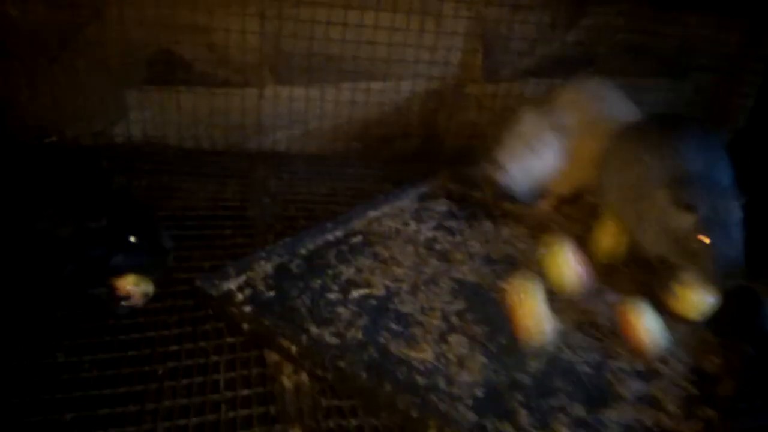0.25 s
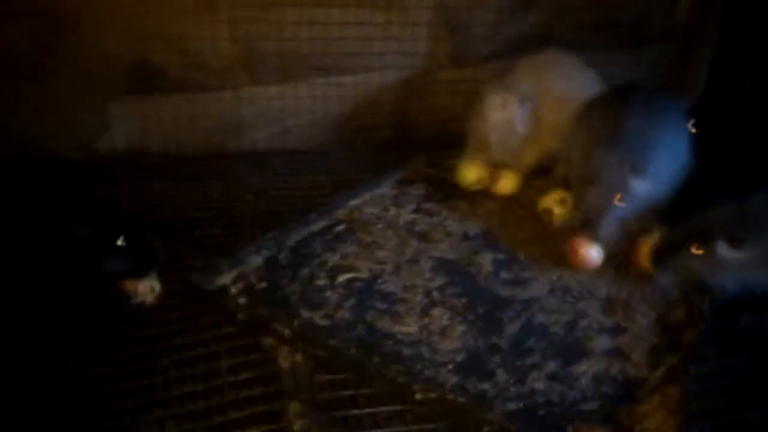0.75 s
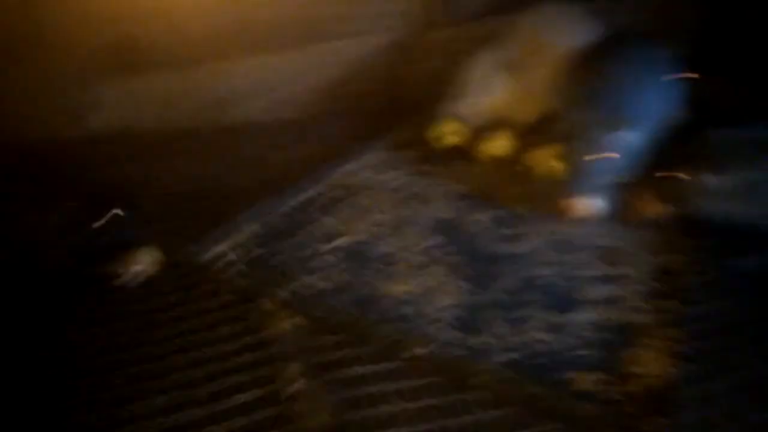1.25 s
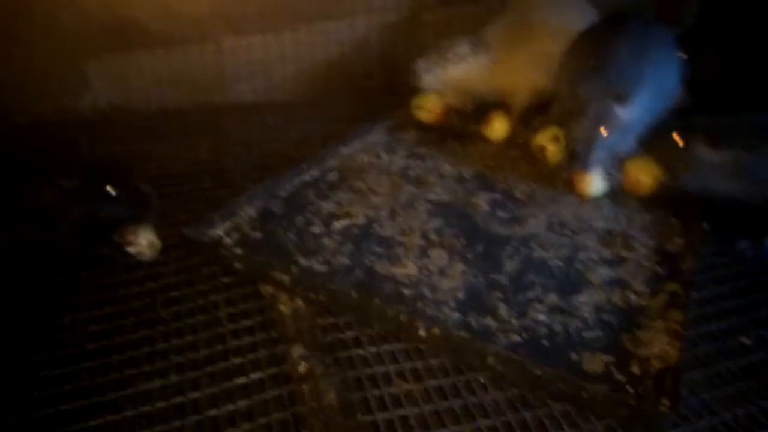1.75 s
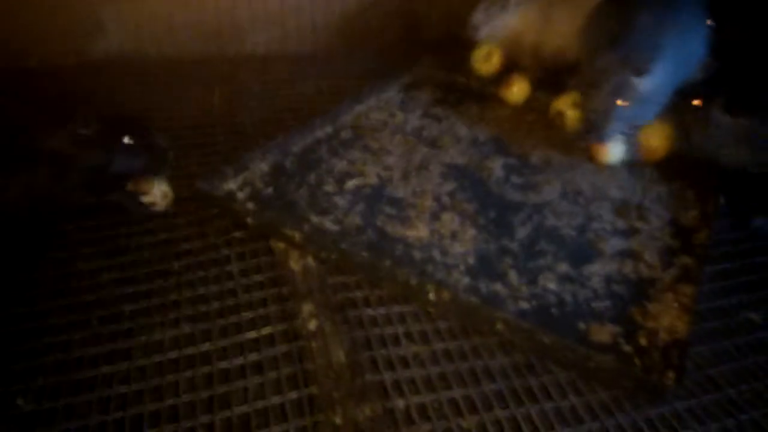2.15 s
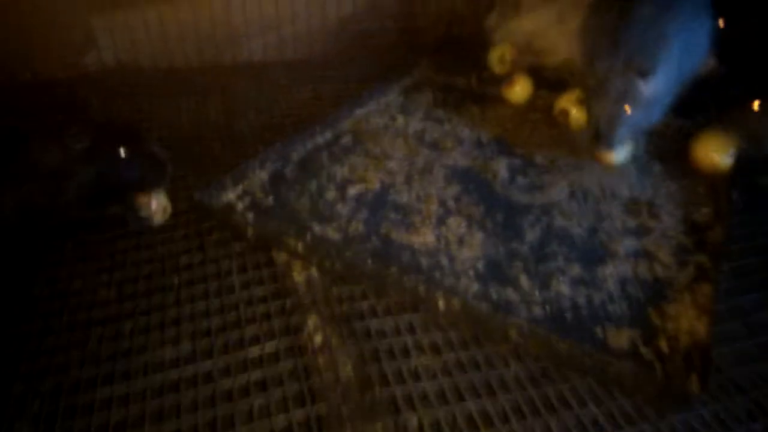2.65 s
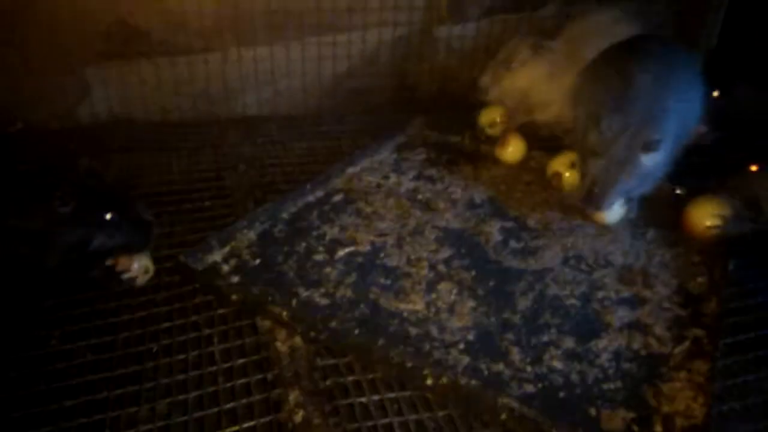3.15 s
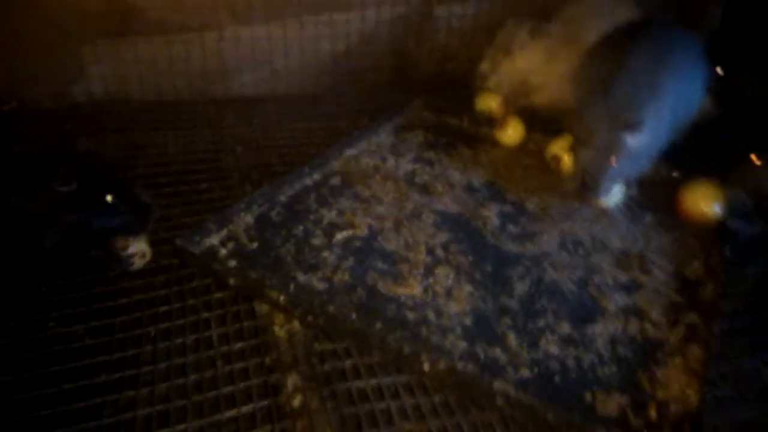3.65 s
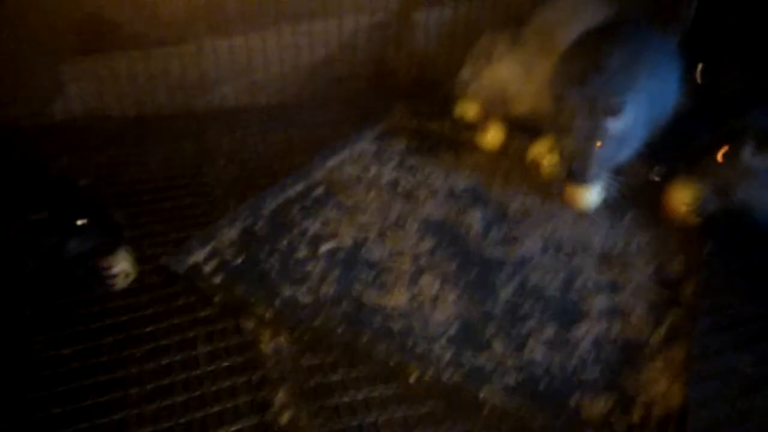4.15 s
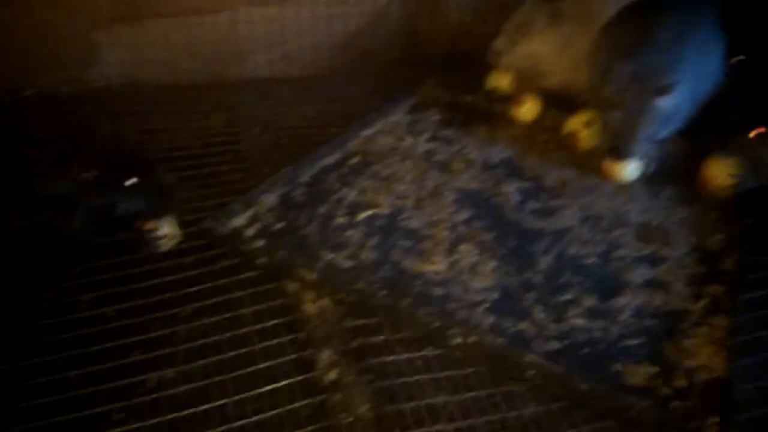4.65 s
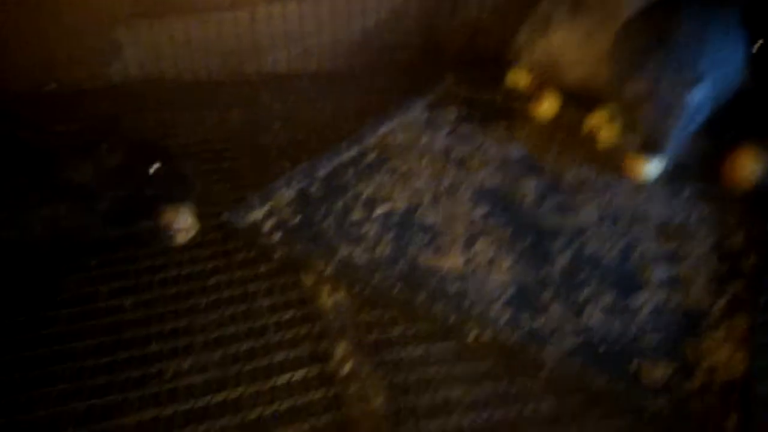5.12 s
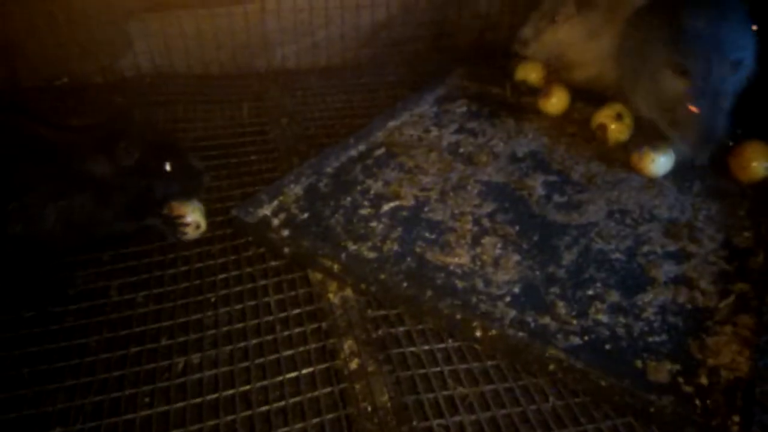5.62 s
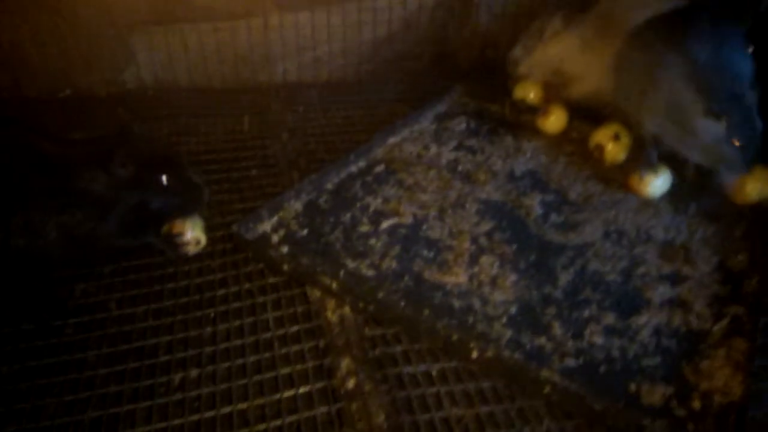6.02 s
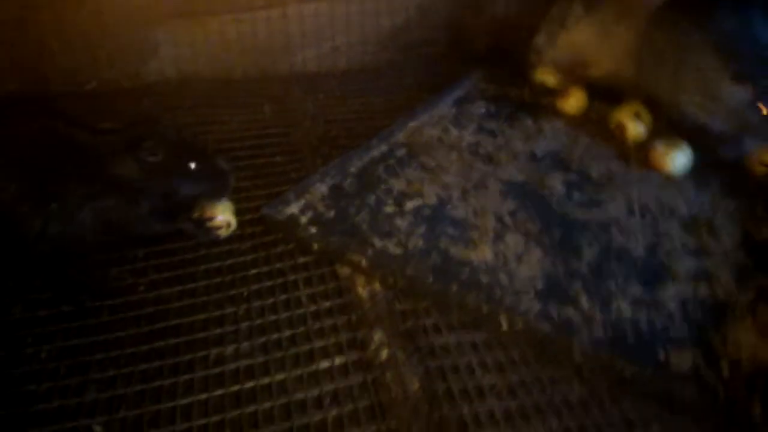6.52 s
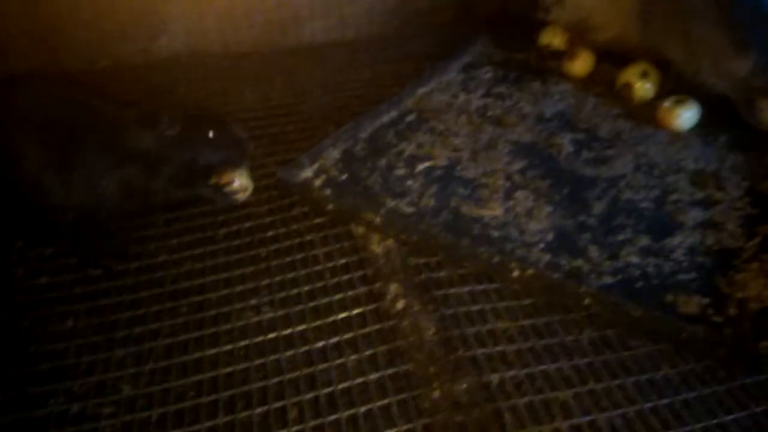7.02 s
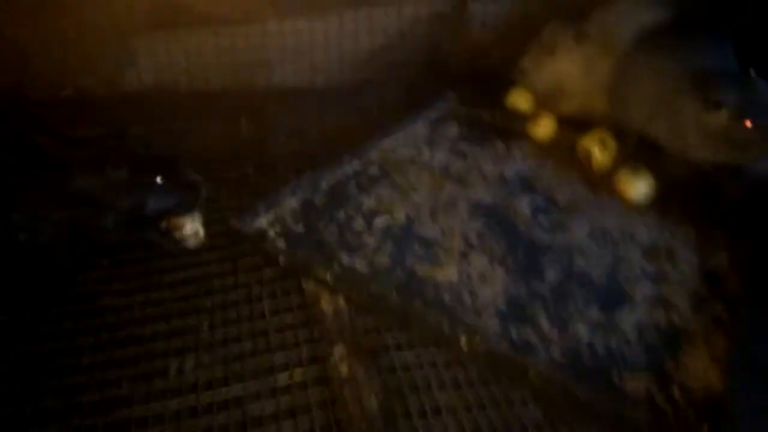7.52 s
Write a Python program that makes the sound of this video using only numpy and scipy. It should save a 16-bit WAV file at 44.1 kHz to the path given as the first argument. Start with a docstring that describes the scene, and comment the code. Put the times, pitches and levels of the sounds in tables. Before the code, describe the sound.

A close, loud tumble of hollow thuds opens as apples drop on a feed tray in a wire cage, with a few lighter knocks after. Then chicks peep almost without pause, sharp falling chirps mixed with short cheeps, while hens give brief low clucks. Claws tick on mesh, straw rustles faintly and a low motor hums. Small shed with short reflections, handheld stereo microphone, duller on the right.

```python
"""Chicks and hens in a shed

Chicks peep (gliding near-sines) and hens cluck (throat-filtered harmonics) among wire cages. Apples thud on
a feed tray (ringing modes and a noise thump), claws tick on the mesh and the cage rattles (shaped noise).
A motor hums (three harmonics) under straw rustle (flickering noise bands).
Two microphone ports hear it with shed reflections; the right one is shadowed in the treble.
"""
import sys
import numpy as np
from scipy import signal
from scipy.fft import rfft, irfft, next_fast_len
from scipy.io import wavfile
from scipy.ndimage import uniform_filter1d

SR = 44100
rng = np.random.default_rng(int(sys.argv[2]) if len(sys.argv) > 2 else 0)


def bounce(signal):
    """Save signal as a 16-bit WAV file at the path given by the first command-line argument."""
    frames = np.transpose(np.atleast_2d(signal))
    limited = np.clip(frames, -1, 1)
    pcm = np.round(limited * 32767).astype(np.int16)
    wavfile.write(sys.argv[1], SR, pcm)


N = 343098
PADDED = next_fast_len(N + SR // 2, True)
HZ = np.fft.rfftfreq(PADDED, 1 / SR)


def undb(db):
    """dB to gain."""
    return 10 ** (np.asarray(db) / 20)


def shape(hz, table):
    """Gain at hz, interpolated in dB over log frequency."""
    f, db = np.transpose(table)
    return undb(np.interp(np.log(np.maximum(hz, 1)), np.log(f), db))


def unit(x):
    """Scale to rms 1."""
    return x / np.sqrt(np.mean(x ** 2))


def noise(table):
    """Noise of rms 1, coloured by (Hz, relative dB) points."""
    white = rfft(rng.standard_normal(PADDED))
    return unit(irfft(white * shape(HZ, table), PADDED)[:N])


def walk(rate_hz, size=N):
    """Smooth random wander with spread near 1: held random steps, averaged twice."""
    k = max(int(SR / rate_hz), 1)
    steps = np.repeat(rng.standard_normal(size // k + 1), k)
    return 1.255 * uniform_filter1d(uniform_filter1d(steps, k), k)[:size]


def add(out, start_s, x):
    """Mix x into out from start_s on."""
    i = int(start_s * SR)
    out[i:i + len(x)] += x[:N - i]


def fades(size, attack_s, release_s):
    """Rounded start and end."""
    t = np.arange(size) / SR
    ramp = np.minimum(t / attack_s, t[::-1] / release_s)
    return np.sin(np.pi / 2 * np.clip(ramp, 0, 1)) ** 2


# Background levels. Each row: time in seconds, hum in dB, straw rustle in dB.
SHED_LEVELS = [(0, -40, -46), (.45, -40, -50), (.7, -49, -56.5), (1.0, -45.5, -53), (1.7, -41, -49.5),
               (2.2, -39.5, -53.5), (3.1, -35.5, -45), (3.42, -37, -55), (3.75, -39, -47.5),
               (4.2, -37, -53), (5.0, -37.5, -51.5), (5.5, -38.5, -54), (6.3, -43.5, -53), (7.05, -44, -47),
               (7.4, -39.5, -51.5), (7.78, -39, -50.5)]
# Motor hum harmonics. Each row: multiple of the motor speed, level relative to the hum in dB.
HUM_HARMONICS = [(1, -7), (2, -16.5), (3, -30.5)]
# Straw rustle spectrum. Each row: frequency in Hz, relative density in dB per Hz.
RUSTLE_SPECTRUM = [(24, -46), (40, -6), (77, -4), (121, -7), (151, -15.5), (262, -16), (2050, -26),
                   (4240, -30), (7930, -35), (16000, -42.5)]
MOTOR_START_HZ, SPEEDS_UP_HZ_PER_S = 51.1, .45


def shed():
    """A motor hum of wavering speed, over rustle whose octave bands flicker partly on their own."""
    s, hum_db, rustle_db = np.transpose(SHED_LEVELS)
    t = np.arange(N) / SR
    motor_hz = (MOTOR_START_HZ + SPEEDS_UP_HZ_PER_S * t) * (1 + 0.0051 * walk(3.33))
    turn = 2 * np.pi * np.cumsum(motor_hz) / SR
    hum = np.zeros(N)
    for k, db in HUM_HARMONICS:
        hum += np.sqrt(2) * undb(db + 1.2 * k * walk(6)) * np.sin(k * turn)

    spectrum = rfft(noise(RUSTLE_SPECTRUM), PADDED)
    shuffle = walk(6)  # shared by all bands
    rustle = np.zeros(N)
    for centre_hz in 40 * 2. ** np.arange(9):
        octaves = np.log2(np.maximum(HZ, 1) / centre_hz)
        band = np.cos(np.pi / 2 * np.clip(octaves, -1, 1)) ** 2
        flicker_db = 1.2 * shuffle + 2.2 * walk(7) + 1.2 * walk(25)
        rustle += irfft(spectrum * band, PADDED)[:N] * undb(flicker_db)
    return hum * undb(np.interp(t, s, hum_db)) + rustle * undb(np.interp(t, s, rustle_db))


# What the beak passes of the overtones. Each row: frequency in Hz, gain in dB.
BEAK = [(1700, -5), (3200, -28), (4600, -13), (5600, -26), (8000, -34), (13000, -31)]
HOARSE, FLUTTER_HZ = .24, 380  # throat flutter that splits a short call into strands: depth scale, mean rate
ECHO_S, ECHO_DB = .04, -12.5


def whistle(hz, db, attack_s):
    """A quivering near-sine with overtones weighted by frequency through the beak; a wall throws it back once."""
    size = len(hz)
    short = np.sqrt(.3 * SR / size)  # short calls are less steady and hoarser
    quiver = .006 * short * walk(130, size=size) + .008 * walk(25, size=size)
    phase = 2 * np.pi * np.cumsum(hz * (1 + quiver)) / SR
    tone = np.sin(phase)
    for k in (2, 3):
        tone += shape(k * hz, BEAK) * np.sin(k * phase) / (k - 1)

    flutter = np.sin(2 * np.pi * np.cumsum(FLUTTER_HZ * (1 + .3 * walk(60, size=size))) / SR)
    hoarse = 1 + HOARSE * (short - 1) * (flutter + .7 * walk(900, size=size))
    level = np.sqrt(2) * undb(db + 2.15 * short ** .5 * walk(60.5, size=size))
    call = tone * hoarse * level * fades(size, attack_s, 0.012)
    late = np.zeros(int(ECHO_S * SR))
    return np.append(call, late) + undb(ECHO_DB) * np.append(late, call)


# Full peeps scoop up, sag, then drop. Each row: start in seconds, length in seconds, top in Hz, end in Hz,
# scoop as a share of the top, level at mid-length in dB, swell from start to end in dB.
PEEP_CALLS = [(0.0, 0.12, 3900, 2910, 0.014, -49.5, -4), (0.845, 0.23, 4116, 2990, 0.072, -45, 5),
              (1.668, 0.18, 4070, 3000, 0.011, -46.5, 6), (2.015, 0.075, 4520, 2890, 0.34, -46.5, 8),
              (2.608, 0.23, 4060, 2930, 0.1, -44, 5), (3.514, 0.28, 4060, 2650, 0.08, -45.5, 9),
              (3.92, 0.07, 4560, 2930, 0.24, -41, 3), (4.627, 0.3, 4197, 2990, 0.11, -38, 9),
              (5.07, 0.16, 4616, 2810, 0.3, -40.5, 11), (5.774, 0.07, 3810, 2605, 0.054, -43, 14),
              (6.037, 0.3, 4240, 3010, 0.13, -40.5, 8.5), (6.465, 0.148, 4385, 2990, 0.018, -39.5, -2.5),
              (6.899, 0.042, 2770, 2220, 0.19, -46, 14), (6.974, 0.047, 3915, 3030, 0.21, -43.5, 7),
              (7.33, 0.27, 4196, 3130, .07, -49.5, 5), (7.705, 0.088, 4290, 4160, 0.055, -48.5, 14)]
# Plain notes glide one way. Each row: start in seconds, length in seconds, start pitch in Hz, end pitch in Hz,
# level at mid-length in dB, swell from start to end in dB.
PLAIN_NOTES = [(0.239, 0.045, 4240, 3100, -51, -2), (0.308, 0.065, 4010, 3230, -52.5, -10),
               (0.739, 0.031, 2790, 2400, -52.5, 0), (1.416, 0.045, 2430, 2590, -50, 2),
               (1.409, 0.055, 3830, 3080, -46.5, 14), (1.464, 0.035, 2666, 2316, -40.5, 2),
               (1.467, 0.027, 5300, 4780, -59, 2), (1.548, 0.032, 4700, 4050, -59, 0),
               (1.624, 0.043, 4860, 3570, -44, 5), (1.499, 0.21, 1413, 1534, -49, -5),
               (1.656, 0.046, 3215, 2970, -47.5, -4), (1.517, 0.066, 2600, 1940, -50, 10),
               (1.694, 0.027, 2600, 2334, -44.5, 4), (1.945, 0.047, 1814, 1800, -48, 11),
               (2.202, 0.074, 3065, 2560, -52.5, 2), (2.291, 0.055, 2620, 2175, -51.5, -23),
               (2.373, 0.047, 2410, 2320, -55, -13), (2.392, 0.05, 3300, 2930, -45.5, -13),
               (2.403, 0.089, 3630, 2920, -45, -4), (2.488, 0.062, 1926, 1556, -52, -8),
               (2.615, 0.037, 3300, 2870, -55, 2), (2.616, 0.048, 2350, 2395, -50, 4),
               (3.386, 0.048, 2500, 2390, -68, -4), (3.57, 0.019, 3380, 2770, -46.5, 6),
               (4.091, 0.065, 1537, 1590, -56, -11), (5, 0.085, 2830, 2326, -53.5, 0),
               (5.13, 0.049, 3120, 2700, -54, -8), (5.155, 0.046, 2410, 2390, -55.5, 5),
               (5.305, 0.09, 3300, 2660, -48, 7), (5.546, 0.062, 3395, 2944, -47, 12),
               (5.617, 0.044, 2700, 2160, -52.5, -14), (5.85, 0.028, 2570, 2470, -54, -5),
               (6.043, 0.067, 3070, 2180, -51, -6), (6.169, 0.044, 2650, 1850, -47, 0),
               (6.63, 0.049, 2370, 1940, -42, -6), (7.021, 0.049, 2820, 2410, -50.5, -8),
               (7.027, 0.028, 5260, 4820, -51, -2), (6.957, 0.015, 2050, 1860, -52, 0),
               (7.156, 0.042, 3500, 3000, -49.5, 0), (7.167, 0.048, 4120, 2944, -44.5, 12),
               (7.22, 0.041, 2490, 2310, -46, -6), (7.687, .09, 3210, 2750, -58, -5),
               (4.766, 0.08, 2080, 1765, -50.5, -1), (5.91, 0.059, 1996, 2003, -52, 13),
               (7.542, 0.084, 1880, 1960, -46.5, -1)]
# Two warbles, a short falling whimper and a low moan, drawn point by point, one list each.
# Each row: time in seconds, pitch in Hz, level in dB.
DRAWN_CALLS = [
    [(0.8, 2014, -51.5), (1.04, 2025, -54), (1.066, 2297, -46), (1.12, 2206, -41.5), (1.156, 2350, -52),
     (1.184, 2210, -39), (1.2, 2230, -48), (1.21, 2340, -51), (1.266, 2424, -45), (1.33, 1930, -40.5)],
    [(3.535, 1970, -53), (3.56, 2340, -51.5), (3.79, 2170, -47), (3.84, 2253, -47.5), (3.91, 2050, -42),
     (3.98, 1920, -48)],
    [(4.325, 1850, -55), (4.357, 1320, -45), (4.39, 1280, -53), (4.44, 1274, -70)],
    [(7.45, 940, -53.5), (7.58, 855, -65), (7.635, 820, -46), (7.7, 797, -51.5), (7.8, 797, -54)],
]
SAG, DROP_S = 0.11, 0.021  # share of the top lost per peep length; time constant of the final drop
SCOOP_S = .015  # time constant of the climb to the top
OVERSHOOT, SETTLE_S = 0.025, 0.03  # early upward bump as a share of the top, and when it peaks
NOTE_BEND, NOTE_FADE = 0.75, 0.14  # under 1 the glide is quickest at first; share of a note spent fading in


def chicks():
    """Full peeps, plain notes, warbles, a whimper and a moan, all from the same whistle; the plain note at 2.49
    s is instead a hen's high falling line."""
    out = np.zeros(N)
    for s, length_s, top_hz, end_hz, scoop, db, swell_db in PEEP_CALLS:
        t = np.arange(0, length_s + 0.013, 1 / SR)
        climb = scoop * np.exp(-t / SCOOP_S)
        bump = OVERSHOOT * (t / SETTLE_S * np.exp(1 - t / SETTLE_S)) ** 3
        held_hz = top_hz * (1 - SAG * t / length_s - climb + bump)
        drop = np.exp(np.minimum(t - length_s, 0) / DROP_S)
        hz = held_hz - (held_hz[-1] - end_hz) * drop
        add(out, s, whistle(hz, db + swell_db * (t / length_s - .5), 0.0075))

    for s, length_s, start_hz, end_hz, db, swell_db in PLAIN_NOTES:
        done = np.minimum(np.arange(0, length_s + 0.0065, 1 / SR) / length_s, 1)
        hz = start_hz + (end_hz - start_hz) * done ** NOTE_BEND
        add(out, s, whistle(hz, db + swell_db * (done - .5), NOTE_FADE * length_s))

    for points in DRAWN_CALLS:
        s, hz, db = np.transpose(points)
        t = np.arange(s[0], s[-1], 1 / SR)
        add(out, s[0], whistle(np.interp(t, s, hz), np.interp(t, s, db), 0.0029))
    return out


# Soft blows on the tray. Each row: start in seconds, peak in dB, centre in Hz.
TRAY_BLOWS = [(0.026, -8.5, 220), (0.036, -6, 450), (0.045, -5.5, 550), (0.054, -10, 460),
              (0.064, -10, 293), (0.166, -24.5, 272), (0.192, -16.5, 247), (0.225, -30, 314),
              (0.269, -16.5, 400), (.366, -20, 305), (1.333, -31.5, 336), (1.477, -35.5, 230),
              (1.61, -37.5, 327), (3.977, -24.5, 250), (4.107, -35.5, 268), (4.303, -33.5, 730),
              (4.69, -33.5, 271), (5.001, -31, 240), (6.119, -30, 450), (6.151, -40, 480),
              (6.371, -18, 760), (6.392, -20, 302), (6.437, -19.5, 327), (6.675, -21, 188),
              (7.122, -26, 480), (7.192, -35.5, 327), (7.443, -27, 390)]
# Tray modes. Each row: frequency in Hz, relative level in dB, t60 of a full blow in seconds.
TRAY_MODES = [(229, 5.5, 0.18), (323, 13.5, 0.25), (394, 9.5, 0.16), (481, 6.5, 0.13), (533, 3, 0.038),
              (790, 2, 0.053), (985, -1, 0.025), (1560, -16, 0.034)]


def thuds():
    """A push rings the modes near its centre, over a broad thump that scuffles on; light blows ring shorter."""
    out, t = np.zeros(N), np.arange(0, .15, 1 / SR)
    for s, db, centre_hz in TRAY_BLOWS:
        lasting = np.clip(1 + (db + 14) / 10, .3, 1)
        modes = np.zeros(len(t))
        for hz, mode_db, t60_s in TRAY_MODES:
            gain = undb(mode_db - 59 * np.log2(hz / centre_hz) ** 2)
            modes += gain * np.sin(2 * np.pi * hz * t) * 1000 ** (-t / t60_s / lasting)

        scuffle = .12 * undb(5 * walk(80, size=len(t))) * 1000 ** (-t / .2)
        push = (1000 ** (-t / 0.048) + scuffle) * np.minimum(t / 0.0017, 1)
        edges_hz = [centre_hz / 2.2, centre_hz * 2.2]
        sos = signal.butter(2, edges_hz, "bandpass", fs=SR, output="sos")
        thump = signal.sosfilt(sos, rng.standard_normal(len(t)) * push)
        blow = unit(modes) * np.minimum(t / .001, 1) + .45 * unit(thump)
        add(out, s, undb(db) * blow / np.abs(blow).max())
    return out


# Claws and beaks on the mesh. Each row: start in seconds, approximate peak of the crack in dB,
# treble drive in dB.
MESH_TICKS = [(0.026, -17, -29), (0.166, -35.5, -48), (0.215, -34, -52.5), (0.2693, -30, -56),
              (0.2974, -34, -54), (0.338, -35, -44.5), (0.4584, -26, -48), (1.339, -26, -57),
              (1.447, -32, -66), (2.171, -29.5, -62), (3.6673, -25.5, -48), (3.985, -29, -70),
              (4.303, -29.5, -49), (4.675, -32.5, -68), (5.44, -36, -52), (5.4954, -23.5, -51),
              (5.684, -29, -46.5), (5.833, -28, -54), (6.343, -20, -49), (6.6383, -30, -65),
              (6.6897, -26, -66), (7.088, -28, -68)]


def ticks():
    """Sharp cracks of mesh noise with a short decaying buzz, and 110 fainter scratches at random."""
    wire_env, treble_env = np.zeros(N), np.zeros(N)
    t = np.arange(0, .12, 1 / SR)
    grain = undb(3 * walk(500))
    wire = noise([(300, -57), (1500, 2.5), (4000, -2.0), (7000, -5.0), (9000, -40.0)]) * grain
    treble = noise([(5500, -47), (7500, 6.0), (11000, -1.0), (16000, -7)]) * grain
    buzz = 2 * 1000 ** (-t / 0.022) * np.minimum(t / 0.0008, 1)
    for s, db, treble_db in MESH_TICKS:
        add(wire_env, s, undb(db) * buzz / 4)  # noise peaks about four times its rms
        add(treble_env, s, undb(treble_db) * buzz)

    for when, size, length in rng.random((110, 3)):
        swell = np.sin(np.pi * np.minimum(t / (.015 + .05 * length), 1)) ** 2
        scratch = undb(5 * size ** 2) * swell
        add(wire_env, when * N / SR, undb(-59.0) * scratch)
        add(treble_env, when * N / SR, undb(-65.0) * scratch)
    return wire_env * wire + treble_env * treble


# Hen clucks. Each row: start in seconds, length in seconds, start pitch in Hz, end pitch in Hz,
# midway pitch bulge as a share, level in dB, odd partials in dB, brightness in dB per octave, roughness 0-1.
HEN_CLUCKS = [(0.54, 0.11, 410, 429, 0.25, -45.5, -11, 6.5, 0.59),
              (.772, 0.18, 578, 424, -0.0059, -45.5, 2, 3, 0.43),
              (1.03, 0.092, 363, 410.7, -0.017, -55, -24, -22, 0.54),
              (2.003, 0.062, 483, 490, 0.13, -47.5, 28, -3, 1),
              (2.061, 0.081, 424, 452, 0.044, -49.5, -9, 4, 0.39),
              (2.19, 0.063, 394.6, 406, 0.019, -44.5, -2.5, -3, 0.18),
              (2.41, 0.14, 416, 450, 0.05, -48, -3, 4.5, 0.66),
              (2.67, 0.048, 448, 384, -0.033, -39, -10, 6, 0.067),
              (3.699, 0.12, 427.6, 406.4, 0.011, -43, 4, 4, 0.4),
              (3.988, 0.077, 427.4, 410.5, -0.025, -41, -6, 7, 0.58),
              (4.45, 0.059, 379, 344, -0.01, -50.5, 11, -14, 0.16),
              (4.773, 0.072, 531, 442, 0.045, -48, -12, 12.5, 0.7),
              (5.953, 0.092, 412.3, 398.4, 0.047, -39.5, 3, 4, 0.22),
              (6.211, 0.1, 422.6, 425, 0.0016, -42, 8, 2, 0.52),
              (6.68, 0.078, 422, 411, 0.029, -40.5, -2, 8.5, 0.37),
              (6.971, 0.034, 417, 418, -0.022, -41, 19, 2, 0.42),
              (7.584, 0.095, 406.5, 406, 0.054, -40.5, -2, 6, 0.19)]
# Throat resonance. Each row: frequency in Hz, gain in dB.
THROAT_GAIN = [(300, -24), (450, -15), (850, -1), (1250, 0), (1650, -3), (2100, -4), (2600, -16),
               (3500, -26), (6000, -36)]
CLUCK_SCOOP, CLUCK_SCOOP_S = .06, 0.0184  # share of the pitch by which a cluck starts flat; time constant


def hens():
    """Harmonic stacks through the throat; roughness shakes pitch and level and lets more breath noise in."""
    out, breath = np.zeros(N), noise(THROAT_GAIN)
    for s, length_s, start_hz, end_hz, arch, db, odd_db, bright_db, rough in HEN_CLUCKS:
        t = np.arange(0, length_s, 1 / SR)
        size = len(t)
        bend = 1 + arch * np.sin(np.pi * t / length_s) - CLUCK_SCOOP * np.exp(-t / CLUCK_SCOOP_S)
        hz = (start_hz + (end_hz - start_hz) * t / length_s) * bend
        shake = rough * (.06 * walk(200, size=size) + .02 * walk(30, size=size))
        phase = 2 * np.pi * np.cumsum(hz * (1 + shake)) / SR
        stack = np.zeros(size)
        for k in range(1, 13):
            partial_db = odd_db * (k % 2) + bright_db * np.log2(k) + 2 * walk(45, size=size)
            stack += shape(k * hz, THROAT_GAIN) * undb(partial_db) * np.sin(k * phase)

        i = int(s * SR)
        voice = unit(stack) * undb(4 * rough * walk(110, size=size))
        voice = voice + (.15 + rough) * breath[i:i + size]
        add(out, s, undb(db) * voice * fades(size, 0.005, 0.024))
    return out


# Cage shakes. Each row: start in seconds, shaking time in seconds, tray rumble in dB, mesh hiss in dB,
# decay of the rumble in dB per second.
CAGE_SHAKES = [(2.867, 0.047, -24, -33.5, 51.5), (6.391, 0.073, -40, -29, 402)]
# Tray rumble spectrum. Each row: frequency in Hz, relative density in dB per Hz.
RUMBLE_SPECTRUM = [(35, -41), (60, -2.5), (173, -7.5), (242, -1.5), (344, -4.5), (392, -4), (489, -9),
                   (2000, -31.5), (2600, -32), (4400, -120)]
# Mesh hiss spectrum. Each row: frequency in Hz, relative density in dB per Hz.
MESH_SPECTRUM = [(600, -60), (1200, -13), (3000, -16.5), (6500, -22.5), (11000, -33), (16000, -40)]
HISS_DECAY_RATIO = 1.37  # hiss decay rate over rumble decay rate


def rattles():
    """The shaken tray rumbles unevenly while the mesh hisses in grains; both die away afterwards."""
    rumble = noise(RUMBLE_SPECTRUM) * undb(2.8 * walk(90))
    hiss = noise(MESH_SPECTRUM) * undb(2.5 * walk(450))
    out, t = np.zeros(N), np.arange(N) / SR
    for s, shaking_s, rumble_db, hiss_db, db_per_s in CAGE_SHAKES:
        lost_db = db_per_s * np.maximum(t - s - shaking_s, 0)
        mix = undb(rumble_db - lost_db) * rumble
        mix += undb(hiss_db - HISS_DECAY_RATIO * lost_db) * hiss
        out += mix * np.clip((t - s) / 0.012, 0, 1)
    return out


APART_HZ = 520  # above this the two ports hear mostly different reflections
ROOM_T60_S, ROOM_DB = .16, -4.5


def scene():
    """Direct sound and decaying-noise shed reflections at two ports; bass reflections are mostly shared."""
    dry = rfft(shed() + chicks() + thuds() + ticks() + hens() + rattles(), PADDED)
    t = np.arange(SR // 2) / SR
    tails = rng.standard_normal((2, SR // 2)) * 1000 ** (-t / ROOM_T60_S) * (t > .003)
    tails = tails / np.sqrt(np.sum(tails ** 2, axis=1, keepdims=True))
    shared, other = rfft(undb(ROOM_DB) * tails, PADDED)
    apart = .025 + .975 / (1 + (APART_HZ / np.maximum(HZ, 1)) ** 4)
    # low notes leave through the plank walls, so they hardly echo
    kept = 1 / (1 + (200 / np.maximum(HZ, 1)) ** 2)
    left = 1 + kept * shared
    # the shadowed port gets its treble mostly from the walls
    right = np.sqrt(1 - apart) * left + np.sqrt(apart) * (.15 + undb(5.5) * other)
    return irfft(dry * np.array([left, right]), PADDED)[:, :N]


# Hand shadow on the right port. Each row: frequency in Hz, gain in dB.
HAND_SHADOW = [(300, -1.5), (1200, -.5), (2400, -9), (5000, -11), (15000, -8)]
TOP_HZ = 15850


def record(dry):
    """The hand shadows the right port; the microphone drops the deep bass and the recorder cuts the top."""
    right = irfft(rfft(dry[1], PADDED) * shape(HZ, HAND_SHADOW), PADDED)[:N]
    low_cut = signal.butter(3, 42, "highpass", fs=SR, output="sos")
    both = signal.sosfilt(low_cut, np.array([dry[0], right]))
    # faint low noise, opposite in sign at the two ports
    low_noise = noise([(40, -11.0), (120, -16), (300, -12.0), (900, -26.0)])
    both = both + undb(-66.0) * np.array([[1], [-1]]) * low_noise
    top_cut = signal.ellip(10, .2, 80, TOP_HZ, fs=SR, output="sos")
    return signal.sosfilt(top_cut, both)


dry = scene()
out = record(dry)
bounce(out)
```